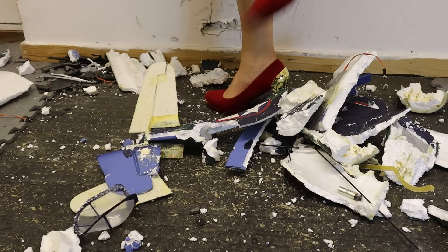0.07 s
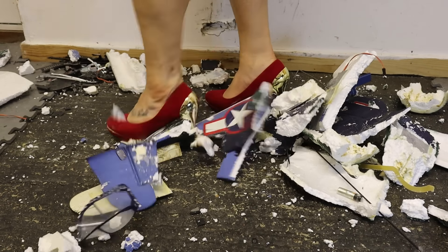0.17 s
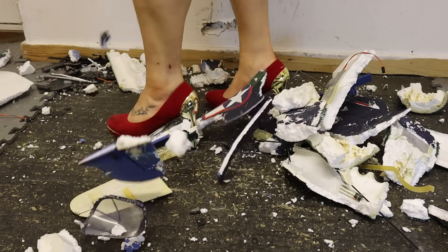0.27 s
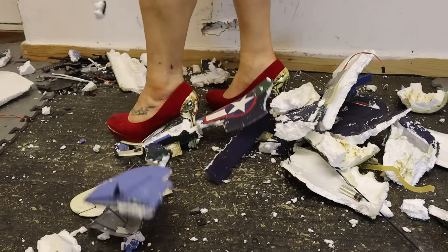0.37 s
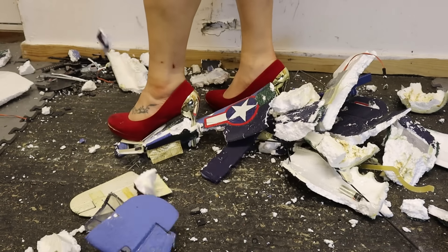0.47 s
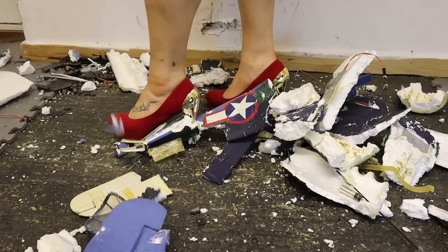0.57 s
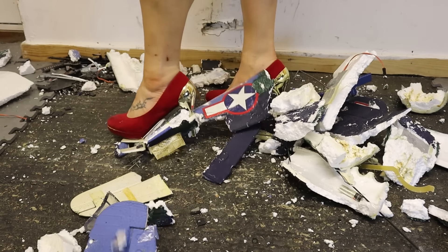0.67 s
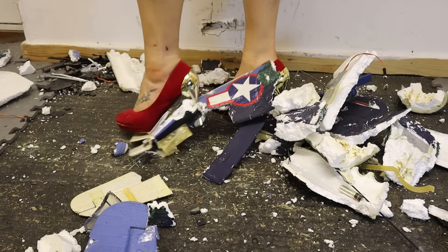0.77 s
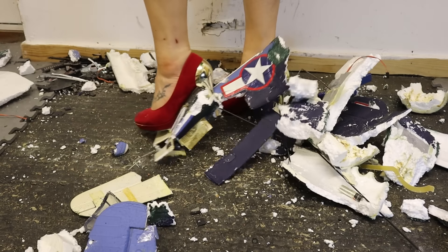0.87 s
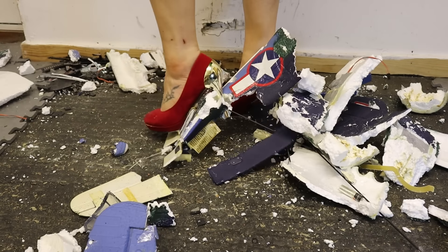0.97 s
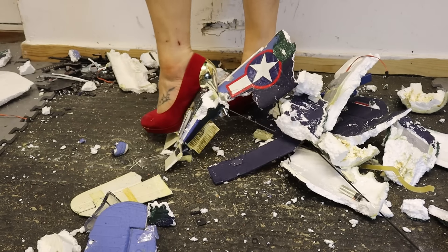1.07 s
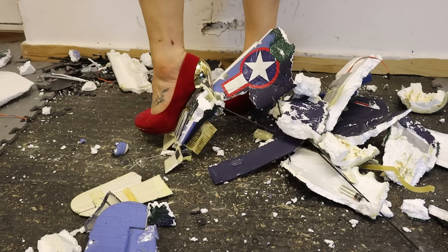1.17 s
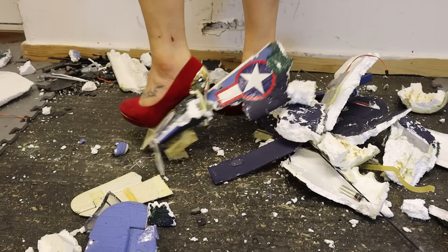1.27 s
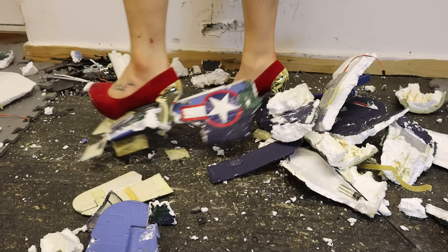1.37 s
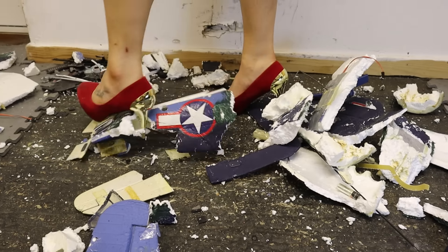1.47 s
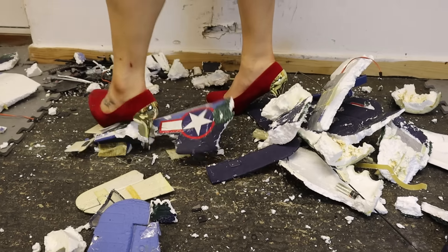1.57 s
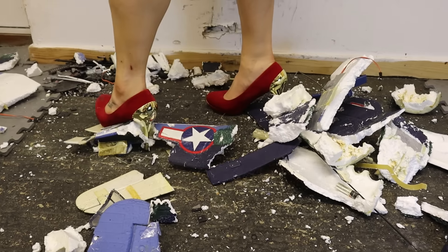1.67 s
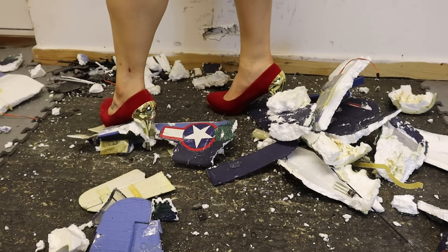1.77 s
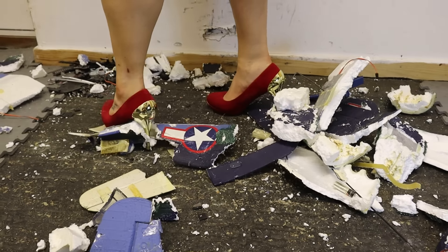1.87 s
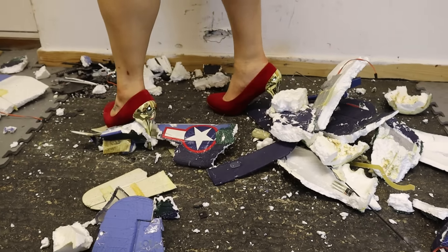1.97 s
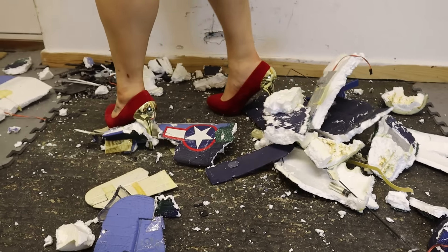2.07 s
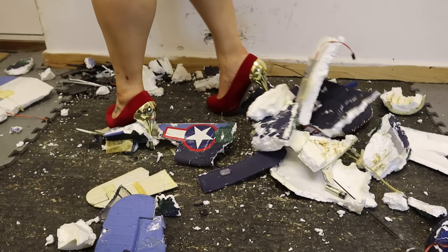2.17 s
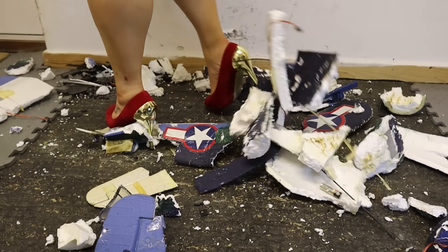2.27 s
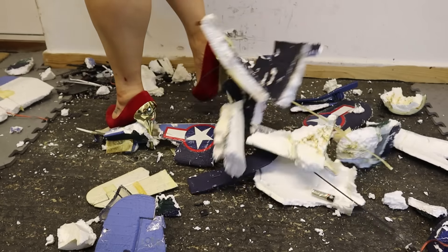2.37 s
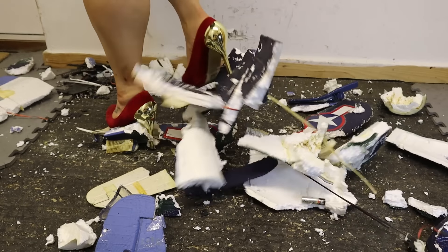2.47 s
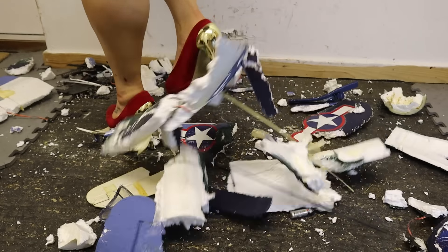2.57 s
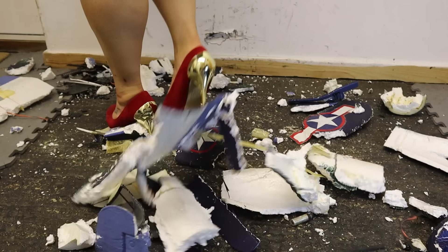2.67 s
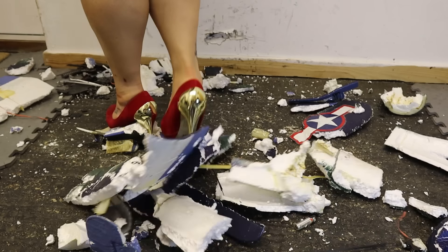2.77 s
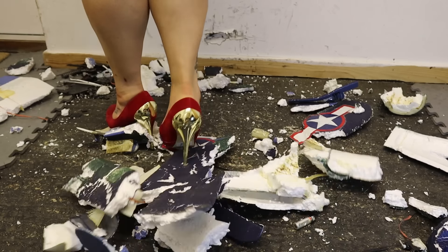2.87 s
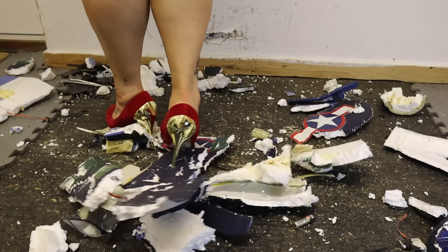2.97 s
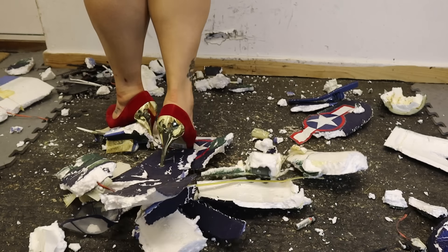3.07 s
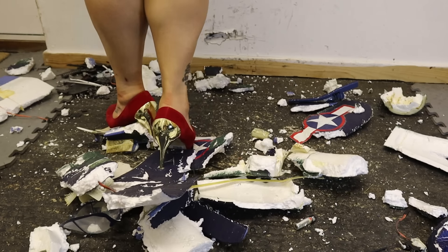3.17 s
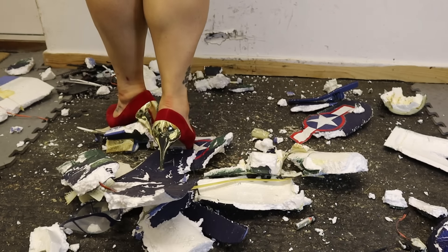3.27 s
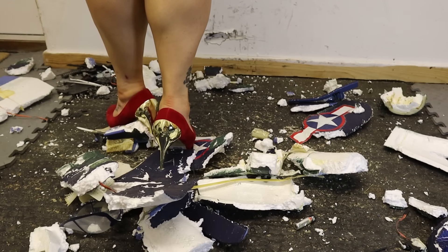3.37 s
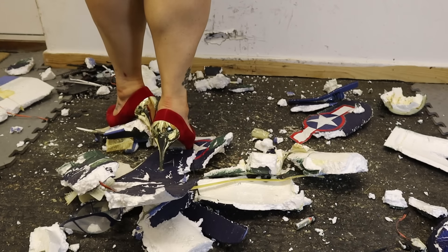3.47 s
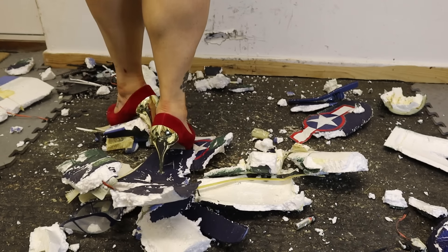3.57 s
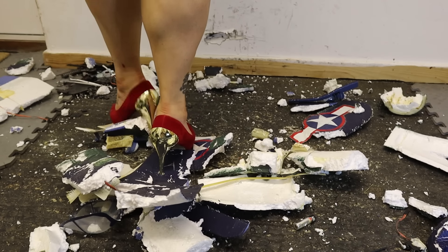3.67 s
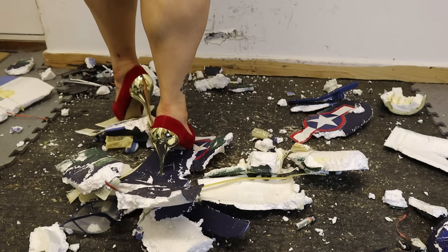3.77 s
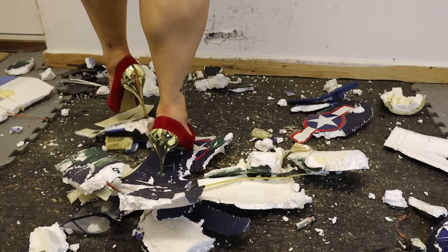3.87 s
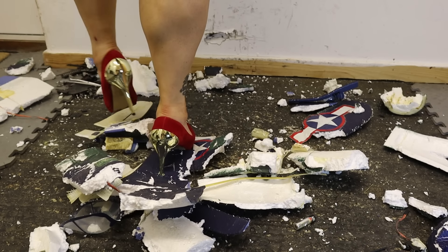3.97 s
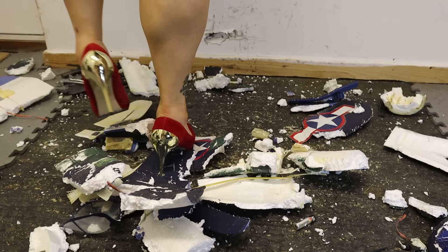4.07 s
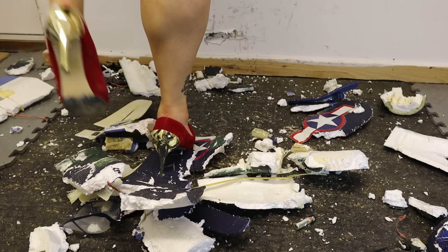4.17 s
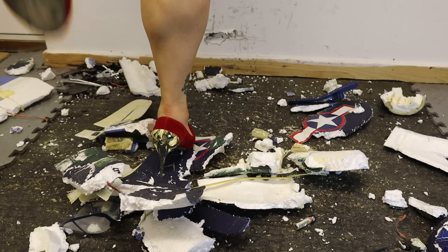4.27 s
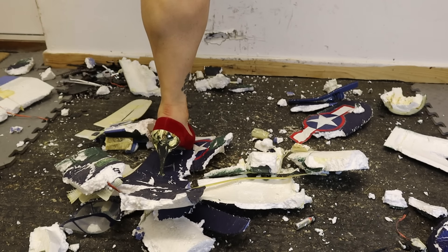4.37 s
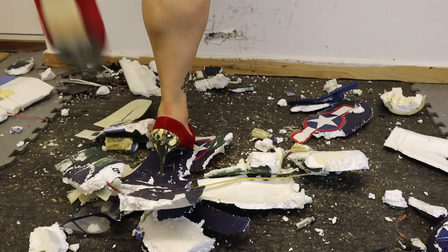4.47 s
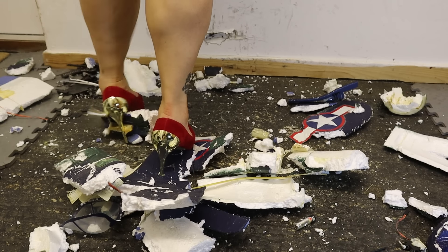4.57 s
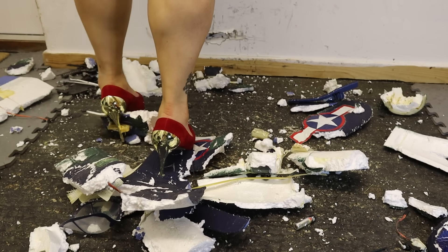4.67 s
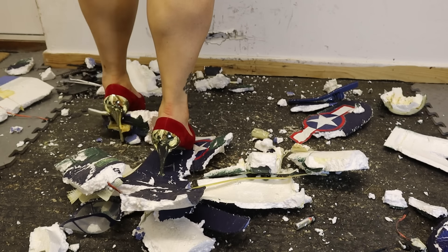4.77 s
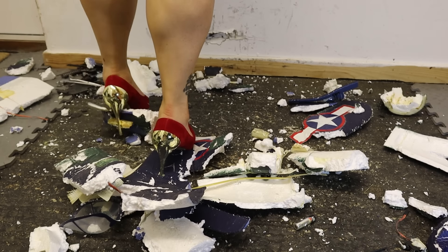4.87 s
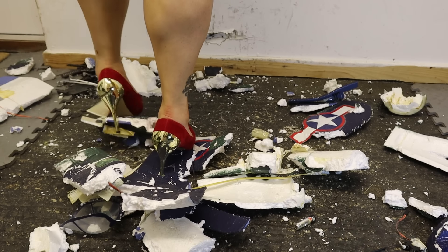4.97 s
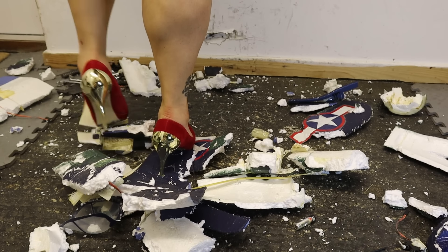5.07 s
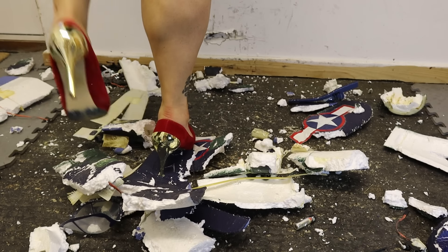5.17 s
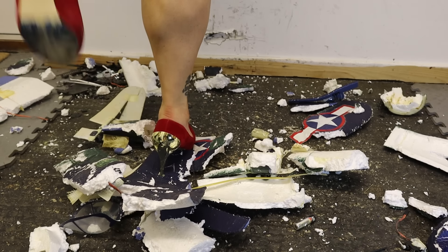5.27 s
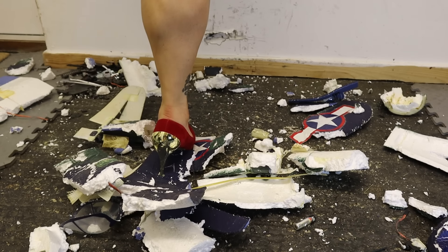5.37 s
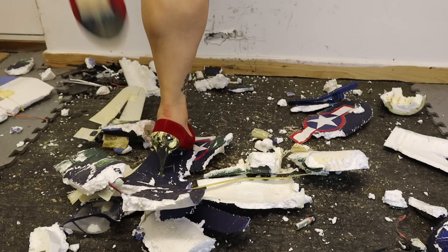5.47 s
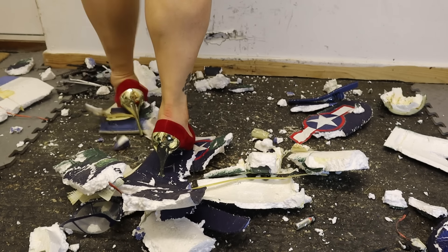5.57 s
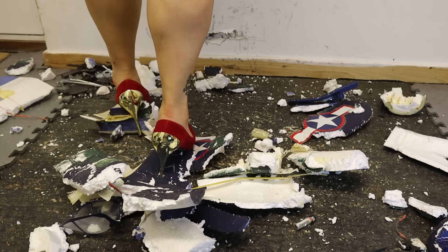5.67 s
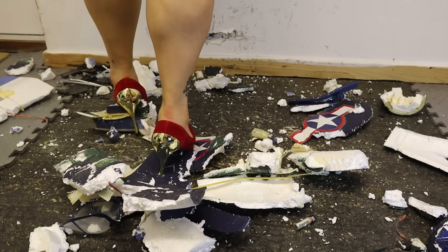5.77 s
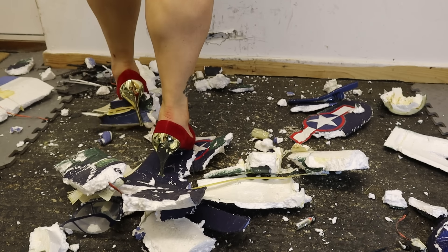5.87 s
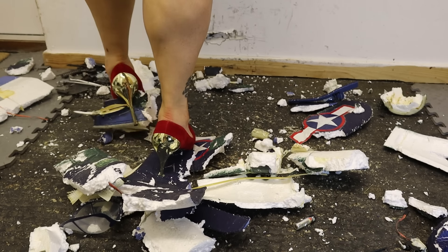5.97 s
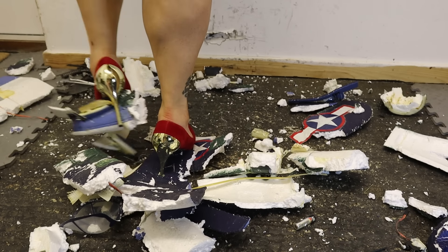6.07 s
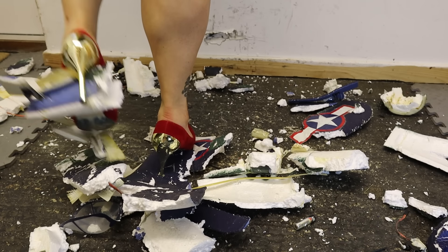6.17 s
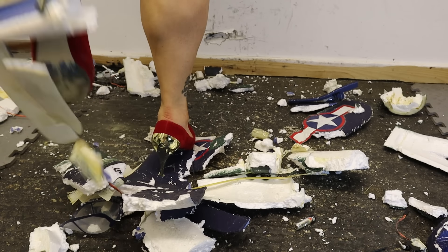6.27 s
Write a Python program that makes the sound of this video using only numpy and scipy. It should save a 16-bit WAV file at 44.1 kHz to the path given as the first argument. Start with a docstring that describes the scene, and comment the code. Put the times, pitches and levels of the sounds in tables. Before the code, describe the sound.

Close stereo pickup of heeled shoes breaking foam and plastic scraps on a matted floor. A faint knock precedes one very sharp, loud stamp. Pieces then rub, click and snap softly, swelling into a long gritty drag with crunches and low juddering. It settles to light shuffles and near silence before two knocking, duller stamps, each followed by crumbling and scraping. Short dense reflections from a small room, low steady background hush.

```python
"""A faint scrape and a soft knock, then the first of three high-heel stamps on a foam model plane.
The plane lies on a matted floor in a small hard room. Each stamp touches down, crushes the foam
and slams the sole home: impulses, avalanches of clicks and decaying floor modes. Between stamps
short pushes and one long sweep slide the wreck: filtered stick-slip clicks make it scrape and
crunch, with snaps, bumps and squeaks. A quiet filtered-noise hush lies under everything."""
import sys
import numpy as np
from scipy import signal
from scipy.fft import rfft, irfft
from scipy.io import wavfile
from scipy.ndimage import uniform_filter1d

SR = 44100
rng = np.random.default_rng(int(sys.argv[2]) if len(sys.argv) > 2 else 0)


def generate_wav(signal):
    """Clip the signal to [-1, 1] and save it as 16-bit WAV at the path in sys.argv[1]."""
    frames = np.transpose(np.atleast_2d(signal))
    scaled = np.clip(frames, -1, 1) * 32767
    pcm = np.round(scaled).astype(np.int16)
    wavfile.write(sys.argv[1], SR, pcm)


N = 278712

# Stamps: [touch t/s, landing t/s, sole level/dB, sole f/Hz, decay of the give t/s,
#          floor thump level/dB, crumbling f/Hz, floor ring level/dB re the sole, before the common ring level]
STAMPS = [(0.2115, 0.2245, -1.5, 1940, 0.0025, -32.5, 1960, -7.5),
          (4.6117, 4.624, -6.5, 516, 0.012, -20, 1270, -3),
          (5.6376, 5.6496, -5.5, 796, 0.0073, -34, 935, -4.5)]
# First contact, softer and duller than the sole: level/dB, f as a share of the sole's, decay t/s, ring/dB
TOUCH_DB, TOUCH_PITCH, TOUCH_S, TOUCH_RING_DB = -19, 0.35, 0.0096, -13.5
# The floor takes the weight: f/Hz, decay t/s, ring/dB
THUMP_HZ, THUMP_S, THUMP_RING_DB = 168, 0.0082, -3.5
# Then the foam caves in: delay after landing t/s, level/dB, decay t/s, ring/dB
CRUMBLE_AFTER_S, CRUMBLE_DB, CRUMBLE_S, CRUMBLE_RING_DB = 0.042, -26.5, 0.047, -21
# Foam and plastic cracking under a stamp: [t/s, level/dB, centre f/Hz, decay t/s]
CRACKS = [(0.2185, -9.5, 2050, 0.0048), (0.2211, -8.5, 1720, 0.0014), (0.2347, -9.5, 1760, 0.0031),
          (4.6159, -13.5, 3200, 0.005), (4.6289, -6.5, 1327, 0.0024), (4.641, -16, 1770, 0.0028),
          (5.6394, -10.5, 2200, 0.0065), (5.644, -9, 4330, 0.002)]
CRACK_RING_DB = -19.5
# Spectrum of crushed foam: [f/Hz, relative level/dB]
CRUSHED_FOAM = [(40, 7), (100, -6), (160, -1.5), (240, 3), (320, -2), (400, 2.5), (630, 3.5), (760, -3.5),
                (950, 4), (2300, -1.5), (3300, -2.5), (4800, -1), (6300, -8.5), (9000, -4), (11500, -2.5),
                (14000, -9.5), (16000, -35)]
# Modes of floor, shoe and wreck: [f/Hz, relative level/dB, undamped t60/s]
FLOOR_MODES = [(150, -8, .3), (248, -2.5, 0.15), (280, -9.5, 0.24), (396, 1, 0.34), (491, 7, 0.2),
               (558, 2.5, 1), (646, 2, .32), (953, 5.5, 0.46), (1000, -1.5, 0.15), (1043, -2.5, 0.35),
               (1240, -8.5, 0.14), (1645, -3.5, 0.12), (2200, -2, .2)]
DAMPING_S = 0.16  # Gaussian time constant of the foot's damping

# Short pushes sliding the wreck: [start t/s, length t/s, scrape level/dB,
#          shuffle level/dB re scrape, fizz level/dB re scrape, rubbed piece f/Hz]
PUSHES = [(0.0, 0.019, -67, 0, -4, 2500), (0.498, 0.027, -43, -0.5, -26, 1120),
          (0.56, 0.21, -56, -9, -3.5, 1200), (0.7, 0.19, -56, -4, 3, 2000),
          (0.78, 0.061, -43.5, -13.5, -6, 1800), (0.807, 0.13, -41, -16, -0.5, 1930),
          (0.94, 0.12, -46, -4.5, -3.5, 1660), (1.09, 0.37, -51.5, -3, -2.5, 2000),
          (1.275, 0.081, -41, -14, -28, 2460), (1.356, 0.037, -30.5, -19, -26, 1400),
          (1.44, 0.12, -45.5, -5, -15, 1450), (1.575, 0.13, -46, -7, -4, 1750),
          (1.716, 0.031, -37, -13, -26, 1970), (1.78, 0.25, -48.5, -19, -0.5, 1900),
          (1.895, 0.16, -48.5, -31, -0.5, 2680), (2.085, 0.09, -44.5, -32, 0.5, 2700),
          (3.35, 0.028, -51, -25, -5, 2640), (3.44, 0.19, -59, -10, -2, 2920),
          (3.55, 0.22, -51, -14, -5.5, 2860), (3.733, 0.08, -38.5, -0.5, -8, 1430),
          (3.87, 0.083, -49, -7, -2, 1550), (3.951, 0.02, -42, -9, -23, 1400),
          (4.03, 0.06, -82, -4.5, -9, 1700), (4.52, 0.076, -67, 2, -10, 1410),
          (4.92, 0.076, -39.5, -6.5, -3.5, 3180), (5.04, 0.11, -43, -8, -5.5, 1690),
          (5.175, 0.1, -47.5, -9.5, -6.5, 1730), (5.29, 0.08, -68.5, -6, -1, 1600),
          (5.53, 0.078, -51, -20.5, -6, 2430), (5.588, 0.021, -47, -13, -6.5, 2400),
          (5.809, 0.045, -48, -10, -1.5, 3740), (5.925, 0.038, -37.5, -7.5, -4, 2970),
          (6.02, 0.15, -57.5, -8, -6, 1700), (6.175, 0.062, -43, -10, -4.5, 1550),
          (6.303, 0.025, -60, -4, 9, 2950)]
# A push swells over this share of its length, sags in level, then releases with this time constant
SWELL_SHARE, SAG_DB_PER_S, RELEASE_S = 0.15, -17.5, 0.019
# One long sweep of the foot: [t/s, scrape level/dB, shuffle level/dB re scrape, fizz level/dB re scrape],
# all before the offsets below
SWEEP = [(2.17, -47, -14, -5), (2.252, -41, -11.5, -9), (2.322, -45, -7, 1.5), (2.512, -37.5, -3.5, -10.5),
         (2.57, -33, -14, -8), (2.586, -35.5, -6, -12), (2.748, -42, -8, -1), (2.79, -29, -10, -7.5),
         (2.858, -37, 1, -5.5), (2.892, -35.5, -12, -9), (2.928, -38.5, -3.5, -1.5),
         (3.034, -36.5, -19.5, -5.5), (3.094, -30, -12.5, -9), (3.32, -57, -12, -6)]
SWEEP_DB, SWEEP_SHUFFLE_DB, SWEEP_FIZZ_DB, SWEEP_HZ = -2, 1, 1, 1830
JERK_DB = 0.98  # rms depth of the slips, before their slow level is evened out
CRUMB_S = 0.001497  # from a crumb breaking off to its tap on the mat
# Spectrum of rubbed foam: [f/Hz, relative level/dB per Hz]
RUBBED_FOAM = [(29, -49), (50, -23), (91, -14.5), (166, -5), (325, -1.5), (538, -1.5), (790, -0.5),
               (1440, -1), (3030, -1.5), (3340, -3), (4240, -4), (6530, -11.5), (11100, -9.5),
               (13100, -16.5), (15500, -35)]
# Thud or shuffle, crack or scrape, and fizz bands: [lower f/Hz, upper f/Hz]
BAND_EDGES = [(40, 700), (700, 5000), (5000, 16000)]
# The whole wreck drums on the floor in the sweep: f/Hz, resonance Q, level/dB re the shuffle
BOOM_HZ, BOOM_SHARPNESS, BOOM_DB = 156, 2.9, -11

# Brittle foam and plastic snapping: [t/s, relative level/dB, piece f/Hz, fizz level/dB re the snap]
SNAPS = [(0.5006, -37, 2590, -7), (0.769, -45, 1200, -10), (1.3656, -31, 1380, 6.5),
         (1.501, -30.5, 1700, -11), (1.719, -25.5, 2020, -3), (1.8553, -43, 3590, 3.5),
         (1.9139, -31, 2520, 0), (1.9929, -42.5, 2920, 8), (2.0884, -29.5, 2950, -3.5),
         (2.765, -32, 1400, -4), (3.1621, -23.5, 2020, -13.5), (3.273, -38.5, 1490, -8),
         (3.2957, -35.5, 1780, -11.5), (3.3524, -32.5, 3860, -5), (3.3585, -32, 2620, -13),
         (3.7013, -36.5, 2010, -6), (3.751, -26.5, 1500, -13.5), (3.9322, -38, 1450, -7),
         (3.9575, -30.5, 1440, -9), (4.1824, -65.5, 2320, 5.5), (4.8342, -41.5, 5070, -4),
         (4.849, -44, 2100, -12), (4.895, -34.5, 2990, -9), (5.1138, -32, 1290, -13),
         (5.4054, -54, 2860, -8), (5.9767, -32.5, 2420, -14)]
# Soft pieces landing, bumping, caving in: [t/s, relative level/dB, piece f/Hz, fizz level/dB re the bump]
BUMPS = [(0.0655, -47, 505, -24), (0.284, -22, 2200, -12), (0.423, -42.5, 710, -28), (0.547, -43.5, 600, 0),
         (0.562, -39, 630, -12), (0.669, -48.5, 900, -24), (0.767, -43, 970, -11), (0.992, -38, 1760, 0),
         (1.276, -34.5, 2970, 1), (1.306, -39.5, 520, 1), (1.376, -22.5, 1170, -4.5),
         (1.561, -39.5, 900, -2), (1.686, -43, 380, -6), (1.912, -45.5, 520, 0), (2.375, -39, 1100, 5.5),
         (2.428, -40, 800, -17), (2.554, -26.5, 2300, 0.5), (2.676, -31, 1020, -19),
         (2.764, -32.5, 1080, -0.5), (2.784, -28, 1780, -0.5), (2.869, -27, 1350, -28),
         (3.520, -54.5, 380, 2), (3.661, -44.5, 1020, 0), (3.797, -41.5, 727, -6), (4.71, -30.5, 520, -15),
         (4.925, -29.5, 4600, -13), (4.941, -28.5, 1450, -1.5), (5.928, -34.5, 3040, 7.5),
         (6.175, -41, 1210, -5)]
THUD_DB_PER_OCTAVE, THUD_PIECE_HZ = -11, 1000  # the lower a piece, the more it thuds
# Foam squeaking as it tears or drags, one table a squeak: [t/s, f/Hz, level/dB]
SQUEAKS = [
    [(1.372, 1047, -57), (1.385, 1144, -38), (1.398, 1324, -27), (1.412, 1356, -34), (1.45, 1312, -40)],
    [(5.15, 1250, -67), (5.23, 1422, -54), (5.3, 1400, -61), (5.38, 1416, -71)],
]

# Reverberation of the room: [f/Hz, t60/s]
ROOM = [(100, 0.34), (300, 0.35), (800, 0.33), (2000, 0.3), (5000, 0.33), (12000, 0.28)]
# Stereo width: [f/Hz, gain of the side signal/dB]
WIDTH = [(60, -12), (170, -19), (400, -14.5), (700, -9.5), (1300, -4), (2400, 0.5), (4400, 4), (8000, 5),
         (12000, 5.5)]
# Spectrum of the still room: [f/Hz, relative level/dB per Hz]
HUSH = [(18, -31.5), (30, 0.5), (107, -1), (234, -6), (698, -7.5), (794, -11), (928, -9.5), (2250, -13.5),
        (5030, -22.5), (11300, -29), (15000, -51.5)]
HUSH_DB = -69
EDGE_HZ = 15600  # upper limit of the whole sound


def stamps(sharpness=0.7, push_db=-5, wet_db=-4.0, lowest_hz=121):
    """Impact: each blow joins a damped air push to a resonantly filtered fracture of the foam."""
    out = np.zeros((2, N))
    for s, db, hz, decay, _ in blows():
        body = signal.iirpeak(hz, max(sharpness, hz / 7000), fs=SR)
        clicks = fracture(decay, rise=0.00058, spread_db=3)
        crack = through(signal.lfilter(*body, clicks), causal(CRUSHED_FOAM))
        crack /= np.linalg.norm(crack, axis=1, keepdims=True)
        phase = 2 * np.pi * hz * np.arange(crack.shape[1]) / SR
        push = np.sin(phase) * np.exp(-phase / 2)
        push *= np.exp(-decay / 0.013) / np.linalg.norm(push)  # slow crumbling pushes little air
        crack[0] += amp(push_db) * push
        energy = np.sqrt(decay * SR / 2)  # a longer blow carries more energy
        add(out, s, amp(db) * energy * room(crack, wet_db))
    # a small shoe radiates little deep bass
    return signal.lfilter(*signal.butter(2, lowest_hz, "high", fs=SR), out)


def blows():
    """Succession of impacts: touch, sole, floor thump and crumbling, plus cracks.

    Rows are [t/s, level/dB, f/Hz, decay t/s, ring level/dB].
    """
    rows = [(*crack, CRACK_RING_DB) for crack in CRACKS]
    for touch, land, db, hz, give, thump_db, crumble_hz, ring_db in STAMPS:
        rows += [(touch, TOUCH_DB, hz * TOUCH_PITCH, TOUCH_S, TOUCH_RING_DB),
                 (land, db, hz, give, ring_db),
                 (land, thump_db, THUMP_HZ, THUMP_S, THUMP_RING_DB),
                 (land + CRUMBLE_AFTER_S, CRUMBLE_DB, crumble_hz, CRUMBLE_S, CRUMBLE_RING_DB)]
    return rows


def floor_ring(ring_db=-17, swell=0.00072):
    """Modal decay: each blow excites the modes of floor, shoe and wreck, most those near its centre."""
    out, t = np.zeros((2, N)), np.arange(SR // 2) / SR
    mode_hz, mode_db, t60 = np.transpose(FLOOR_MODES)[:, :, None]
    modes = amp(mode_db - 60 * t / t60) * np.exp(2j * np.pi * mode_hz * t)
    modes *= 1 - np.exp(-t / swell)
    modes *= np.exp(-(t / DAMPING_S) ** 2)  # the weight of the foot damps the ring
    for s, db, hz, _, floor_db in blows():
        nearness = 1 / (1 + np.log2(mode_hz / hz) ** 2)
        ring = (modes * nearness).sum(0)
        add(out, s, amp(db + floor_db + ring_db) * np.array([ring.imag, ring.real]))
    return out


def drags(shuffle_db=-3, scrape_db=-6, fizz_db=-3, crumbs_db=-12):
    """Stick-slip friction: foam on the gritty mat gives clumps of tiny clicks under each move."""
    t = np.arange(N) / SR
    slips = evened(uniform_filter1d(uniform_filter1d(rng.standard_normal(N), 260), 130))
    jerks = amp(JERK_DB * slips)
    jerks /= np.sqrt(uniform_filter1d(jerks ** 2, SR // 12))  # slips share out the work of the foot
    crumbs = amp(crumbs_db) * cells(N, 130, spread_db=1.5)  # now and then a larger crumb breaks off
    taps = np.roll(crumbs, round(CRUMB_S * SR), axis=1) / 2  # and lands an instant later
    crumbs = through(crumbs, causal(CRUSHED_FOAM)) + taps
    grit = rubbed_piece((cells(N, 3500, spread_db=1.5) + crumbs) * jerks)
    shuffle, scrape, fizz = (through(grit, causal(RUBBED_FOAM, lo, hi)) for lo, hi in BAND_EDGES)
    steps = t[::64]  # the gains move slowly, so a coarse time grid is enough
    low, middle, high = (np.interp(t, steps, gain) for gain in sliding(steps)[0])
    bright = amp(scrape_db) * middle * scrape + amp(fizz_db) * high * fizz
    return amp(shuffle_db) * low * shuffle + catching() * bright


def sliding(t):
    """Superposed powers of all moves give shuffle, scrape and fizz gains and the mean piece pitch."""
    s, db, low, high = np.transpose(SWEEP)
    outside = abs(t - np.clip(t, s[0], s[-1]))  # time before or after the sweep
    sweep_gain = amp(np.interp(t, s, db) + SWEEP_DB) * np.exp(-outside / RELEASE_S)
    sweep_low = np.interp(t, s, low) + SWEEP_SHUFFLE_DB
    sweep_high = np.interp(t, s, high) + SWEEP_FIZZ_DB
    moves = [(sweep_gain, sweep_low, sweep_high, SWEEP_HZ)]
    for start, length, db, low, high, hz in PUSHES:
        age = np.maximum(t - start, 0)
        swell = np.minimum(age / (SWELL_SHARE * length), 1)
        release = np.exp(-np.maximum(age - length, 0) / RELEASE_S)
        sagging = amp(db + SAG_DB_PER_S * np.minimum(age, length))
        moves.append((sagging * swell * release, low, high, hz))
    power = sum(np.array([gain * amp(low), gain, gain * amp(high)]) ** 2 for gain, low, high, _ in moves)
    pitch = sum(gain ** 2 * hz for gain, _, _, hz in moves) / (power[1] + 1e-30)
    return np.sqrt(power), np.maximum(pitch, 1)


def rubbed_piece(x, ring_db=6, octaves=0.6, patchy_db=1.0):
    """Driven resonance: the piece under the shoe rings, its colour shifting as the contact wanders."""
    hz, t, z = signal.stft(x, SR, nperseg=256)
    ring = amp(ring_db * hump(hz[:, None], sliding(t)[1], octaves))
    noise = rng.standard_normal(z.shape[1:])
    patches = evened(uniform_filter1d(uniform_filter1d(noise, 4, 0), 11, 1))  # smooth in f, then in t
    return signal.istft(z * ring * amp(patchy_db * patches), SR, nperseg=256)[1][:, :N]


def catching(stall_db=-6, before=0.023, after=0.0059):
    """Static friction: a piece catches and bends before it snaps, stalling the slide around each snap."""
    t, held = np.arange(N) / SR, np.zeros(N)
    for s, *_ in SNAPS:
        held = np.maximum(held, np.exp(-((t - s) / np.where(t < s, before, after)) ** 2))
    return amp(stall_db * held)


def boom():
    """Forced resonance: the wreck judders over the floor in the sweep and drums it at one low note."""
    s, db, low, _ = np.transpose(SWEEP)
    level = amp(np.interp(np.arange(N) / SR, s, db + low + BOOM_DB, left=-np.inf, right=-np.inf))
    body = signal.iirpeak(BOOM_HZ, BOOM_SHARPNESS, fs=SR)
    judder = signal.lfilter(*body, cells(N, 720, spread_db=0.5))
    judder = evened(signal.lfilter(*body, judder))
    return uniform_filter1d(level, 900) * judder


def pieces(rows, decay, rise, spread_db, bass_db, middle_db, treble_db, ring_db, sharpness, wet_db):
    """Impulse response of a small body: each piece has its thud, crack, fizz and damped resonance."""
    out = np.zeros((2, N))
    thud, crack, fizz = (causal(RUBBED_FOAM, lo, hi) for lo, hi in BAND_EDGES)
    for s, db, hz, treble in rows:
        bass = THUD_DB_PER_OCTAVE * np.log2(hz / THUD_PIECE_HZ)
        resonance = signal.lfilter(*signal.iirpeak(hz, sharpness, fs=SR), crack)
        rung = crack + amp(ring_db) * resonance
        colour = amp(bass + bass_db) * thud
        colour = colour + amp(middle_db) * rung / np.linalg.norm(rung)
        colour = colour + amp(treble + treble_db) * fizz
        clicks = fracture(decay, rise, spread_db)
        clicks *= np.sqrt(decay * SR / 2) / np.linalg.norm(clicks, axis=1, keepdims=True)
        add(out, s, amp(db) * room(through(clicks, colour), wet_db))
    return out


def squeak(jitter=0.03, overtone_db=-14):
    """Self-excited oscillation: fast uneven stick-slip gives short gliding squeals with an overtone."""
    out = np.zeros((2, N))
    for rows in SQUEAKS:
        s, hz, db = np.transpose(rows)
        t = np.arange(s[0], s[-1], 1 / SR)
        wobble = evened(uniform_filter1d(rng.standard_normal(N), 60))[:len(t)]
        phase = 2 * np.pi * np.cumsum(np.interp(t, s, hz) * (1 + jitter * wobble)) / SR
        mid = np.sin(phase) + amp(overtone_db) * np.sin(2 * phase)
        side = np.cos(phase)
        add(out, s[0], amp(np.interp(t, s, db)) * np.array([mid, side]))
    return out


def room(x, wet_db, build=0.0026):
    """Reverberation: close walls return a dense tail, drawn anew each call, each band with its own t60."""
    count = SR // 2
    echoes = rng.choice([-1., 1.], (2, count)) * (rng.random((2, count)) < 5000 / SR)
    hz, t, z = signal.stft(echoes, SR, nperseg=256)
    tail = signal.istft(z * amp(-60 * t / read(ROOM, hz)[:, None]), SR, nperseg=256)[1]
    tail *= 1 - np.exp(-(np.arange(tail.shape[1]) / SR / build) ** 2)
    tail *= amp(wet_db) / np.linalg.norm(tail[0])
    tail[:, 0] = 1  # the direct sound
    return through(x, tail)


def still_room():
    """Stationary background: white noise filtered to the spectrum of the still room."""
    return amp(HUSH_DB) * through(rng.standard_normal((2, N)), causal(HUSH))


def fracture(decay, rise, spread_db, count=6000):
    """Avalanche: a crack running through foam is a quick burst of clicks that dies away."""
    t = np.arange(count) / SR
    return cells(count, 16000, spread_db) * (1 - np.exp(-t / rise)) * np.exp(-t / decay)


def cells(count, per_s, spread_db):
    """Random impulses: foam cells of very unequal size give way, each heard in mid and side."""
    size = amp(spread_db * np.minimum(rng.exponential(1, count), 4))
    size *= rng.random(count) < per_s / SR
    return evened(size * rng.choice([-1., 1.], (2, count)))


def causal(spectrum, lo=0, hi=SR, size=2048):
    """Minimum phase: a unit-energy response with the given spectrum between lo and hi."""
    hz = abs(np.fft.fftfreq(size, 1 / SR)) + 1
    band = np.sqrt((1 + (lo / hz) ** 10) * (1 + (hz / hi) ** 10))
    gain = amp(read(spectrum, hz)) / band
    log_gain = np.log(np.maximum(gain / gain.max(), 1e-5))
    # the Hilbert transform of the log gain gives the phase
    taps = np.fft.ifft(np.exp(np.conj(signal.hilbert(log_gain)))).real[:size // 2]
    return taps / np.linalg.norm(taps)


def through(x, taps):
    """Linear filtering: convolves each row with a response."""
    return signal.oaconvolve(x, np.atleast_2d(taps), axes=1)[:, :N]


def hump(hz, centre, octaves):
    """Broad resonance: a Gaussian on the octave axis, 1 at its centre."""
    return np.exp(-(np.log2((hz + 1) / centre) / octaves) ** 2)


def amp(db):
    """Level law: decibels to amplitude gain."""
    return 10 ** (np.asarray(db) / 20)


def evened(x):
    """Normalisation: scales to rms 1."""
    return x / np.sqrt(np.mean(x ** 2) + 1e-20)


def read(points, hz):
    """Interpolation: reads a table on a log-frequency axis."""
    f, value = np.transpose(points)
    return np.interp(np.log(hz + 1), np.log(f + 1), value)


def add(mix, s, sound):
    """Superposition: mixes a mid and side sound in at time s."""
    part = mix[:, round(s * SR):][:, :sound.shape[-1]]
    part += sound[..., :part.shape[1]]


def scene():
    """Superposition of all sources as mid and side, near mono in the bass and wide in the treble."""
    snaps = pieces(SNAPS, decay=0.002, rise=0.00058, spread_db=3.5, bass_db=-7.0, middle_db=2.0,
                   treble_db=2.5, ring_db=11.0, sharpness=1, wet_db=0.04)
    bumps = pieces(BUMPS, decay=0.0092, rise=0.0021, spread_db=3.0, bass_db=-9.5, middle_db=-2.5,
                   treble_db=-7.0, ring_db=6.5, sharpness=3.6, wet_db=1.5)
    blows_and_ring = stamps() + floor_ring()
    slides = room(drags(), wet_db=-5) + boom()
    squeals = room(squeak(), wet_db=-9.0)
    mid, side = blows_and_ring + slides + snaps + bumps + squeals + still_room()
    side = irfft(rfft(side) * amp(read(WIDTH, np.fft.rfftfreq(N, 1 / SR))), N)
    return np.array([mid + side, mid - side])


def record(dry):
    """Saturation: the loudest peaks flatten towards full scale; a linear-phase low-pass ends the band."""
    clipped = dry / (1 + dry ** 8) ** (1 / 8)
    low_pass = signal.firwin(301, EDGE_HZ, window=("kaiser", 9), fs=SR)
    return signal.oaconvolve(clipped, low_pass[None], "same")


dry = scene()
out = record(dry)
generate_wav(out)
```